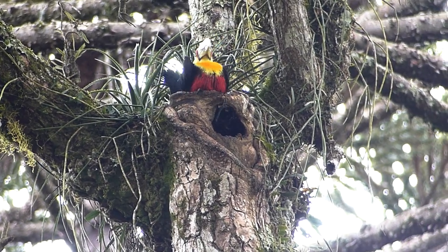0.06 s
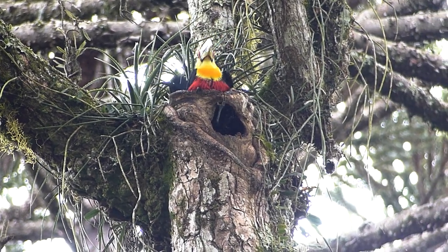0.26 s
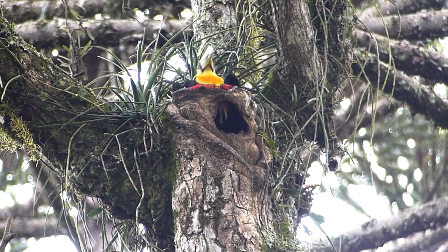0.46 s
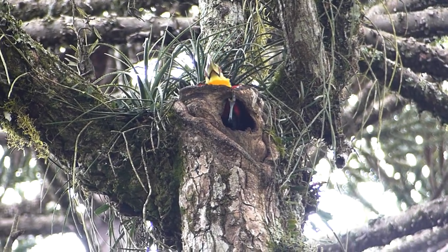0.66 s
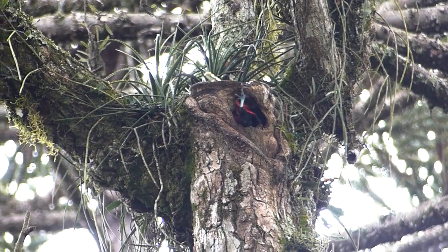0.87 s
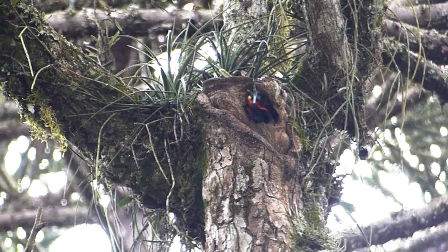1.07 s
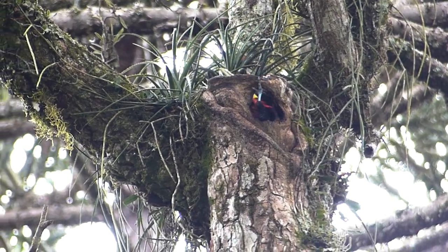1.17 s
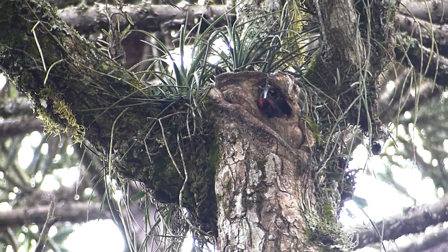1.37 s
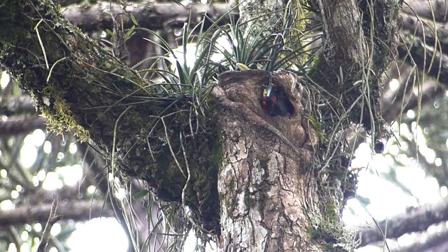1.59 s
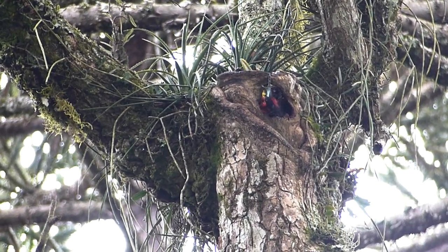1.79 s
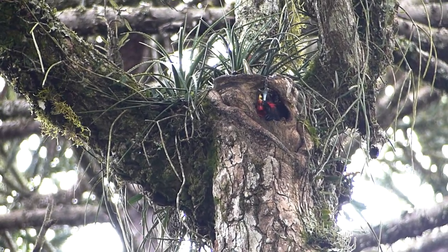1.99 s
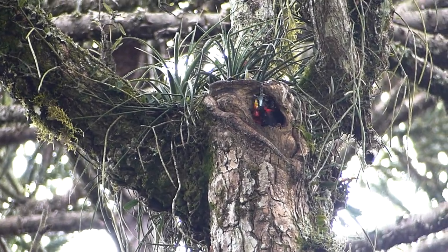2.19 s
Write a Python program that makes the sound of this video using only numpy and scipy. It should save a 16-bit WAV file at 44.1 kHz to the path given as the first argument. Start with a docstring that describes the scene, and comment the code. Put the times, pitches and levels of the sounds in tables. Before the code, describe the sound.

A toucan gives one short harsh squawky yelp, echoing through a forest with faint distant birds

```python
"""A toucan calls in the forest

A toucan in a tree hole gives one short harsh call: two gliding sines, their sum tones and filtered breath noise.
Decaying noise, convolved with the call, makes the forest's echo. Far off another bird, three partials on one
glide, whistles up, holds and slides down amid faint chirps and twitter. An earlier call dies away as filtered
noise; twigs tick as resonant bursts; insects, a wavering far tone and the air are shaped noise."""
import sys
import numpy as np
from scipy import signal
from scipy.io import wavfile

SR = 44100
rng = np.random.default_rng(int(sys.argv[2]) if len(sys.argv) > 2 else 0)


def boost_factor(decibels):
    """Convert a level in decibels to a linear amplitude factor."""
    exponent = np.asarray(decibels, float) / 20
    return 10 ** exponent


def bounce(signal):
    """Save signal as a 16-bit WAV file at the path given by the first command-line argument."""
    frames = np.transpose(np.atleast_2d(signal))
    limited = np.clip(frames, -1, 1)
    pcm = np.round(limited * 32767).astype(np.int16)
    wavfile.write(sys.argv[1], SR, pcm)


N = 99225   # length [samples]


def rms_one(x):
    """Normalization: divides by the root mean square."""
    return x / np.sqrt(np.mean(x ** 2) + 1e-20)


def at_hz(points, hz):
    """Spectral interpolation: linear over log frequency."""
    table_hz, value = np.array(points)[:, :2].T
    return np.interp(np.log(hz), np.log(table_hz), value)


def track(rows, edge_s=0.0043):
    """Piecewise-linear contours: columns joined in time; the last is dB and becomes a gain gated to the rows."""
    s, *columns = np.transpose(rows)
    t = np.arange(N) / SR
    gate = np.clip(np.minimum(t - s[0], s[-1] - t) / edge_s + .5, 0, 1)
    lines = [np.interp(t, s, c) for c in columns]
    return lines[:-1] + [boost_factor(lines[-1]) * gate]


def drift(rate):
    """Random modulation: white noise through a two-pole lowpass with its corner near rate [Hz]; rms 1."""
    r = np.exp(-2 * np.pi * rate / SR)
    slow = signal.lfilter([1], [1, -2 * r, r * r], rng.standard_normal(N + SR))
    return rms_one(slow[SR:])   # the filter has settled


def resonate(x, hz, width):
    """Damped resonance: a pole pair whose radius sets the bandwidth, with zeros at 0 Hz and SR / 2."""
    r = np.exp(-np.pi * width / SR)
    zeros = [(1 - r * r) / 2, 0, (r * r - 1) / 2]
    poles = [1, -2 * r * np.cos(2 * np.pi * hz / SR), r * r]
    return signal.lfilter(zeros, poles, x + 1e-18)


def bandpass(x, order, low_hz, high_hz):
    """Band limiting by a Butterworth filter."""
    return signal.sosfilt(signal.butter(order, [low_hz, high_hz], "band", fs=SR, output="sos"), x)


def left_right(mid, side):
    """Mid/side stereo: left is the sum, right the difference."""
    return mid + side * [[1], [-1]]


def pan(x, db):
    """Interaural level difference: left is db above right."""
    return x * boost_factor(np.array([[db / 2], [-db / 2]]))


def narrow_noise(hz, width, side_db):
    """Resonance-filtered noise: stereo noise twice through one resonance; mid rms about 1."""
    once = resonate(rng.standard_normal((2, N)), hz, width)
    mid, side = rms_one(resonate(once, hz, width))
    return left_right(mid, boost_factor(side_db) * side)


# spectrum of the air: (frequency [Hz], relative density [dB per Hz])
AIR_SPECTRUM = [(15, -22), (25, -8), (45, -13), (90, -11), (135, -3.5), (180, -8), (400, -7.5), (700, -7.5),
                (1000, -4.5), (1250, -7), (1700, -13.5), (2400, -17.5), (3500, -21), (4900, -16.5),
                (6000, -19.5), (9000, -19.5), (12000, -24.5), (15000, -32)]
# stereo width of the air: (frequency [Hz], side minus mid [dB])
AIR_WIDTH = [(30, -23), (110, -4.5), (200, 2), (370, 9), (690, 6.5), (1260, -1.5), (2320, 1), (4260, -3),
             (7840, -7), (14400, -6.5)]
# rise and fall of the air around 950 Hz: (time [s], relative level [dB])
AIR_RUSTLE = [(0.0, -63.5), (0.44, -61.5), (0.85, -64.5), (1.2, -62), (1.52, -65.5), (2.01, -66),
              (2.25, -66)]


def air(patchy_db):
    """Third-octave noise synthesis: each band has its own level, flicker and stereo width; mid rms 1."""
    mids, sides = 0, 0
    edges = 20 * 2 ** (np.arange(30) / 3)
    white = rng.standard_normal((2, 2, N + SR // 4))   # neighbouring bands use different noise
    rustle = track(AIR_RUSTLE, edge_s=1e-6)[0]
    rustle = rustle / rustle.mean()
    for k, (low, high) in enumerate(zip(edges, edges[1:])):
        mid, side = bandpass(white[k % 2], 2, low, high)[:, -N:]
        hz = np.sqrt(low * high)
        rustle_share = np.exp(-np.log2(hz / 950) ** 2 / 0.2)
        gain = boost_factor(at_hz(AIR_SPECTRUM, hz) + patchy_db * drift(15.3)) * rustle ** rustle_share
        mids = mids + gain * mid
        sides = sides + gain * boost_factor(at_hz(AIR_WIDTH, hz)) * side
    return left_right(mids, sides) / np.std(mids)


# insect bands: (centre [Hz], width of each resonance [Hz], median mid level [dB])
INSECT_BANDS = [(5996, 650, -75), (6540, 100, -83)]


def insects():
    """Amplitude-modulated band noise: steady hiss bands that waver slightly."""
    return sum(boost_factor(db + 0.5 * drift(3.4)) * narrow_noise(hz, width, side_db=-6)
               for hz, width, db in INSECT_BANDS)


# envelope of a wavering far tone, 5 dB above what is played: (time [s], level [dB])
HUM_LEVEL = [(0.0, -70.5), (1.12, -65), (1.14, -57.5), (1.65, -76), (1.83, -60.5), (1.89, -73), (2.24, -71),
             (2.25, -77)]


def hum():
    """Narrow-band noise: so small a bandwidth is heard as a wavering tone."""
    return boost_factor(-5) * track(HUM_LEVEL, edge_s=1e-6)[0] * narrow_noise(821, 36.6, side_db=-16)


# drips and twig ticks: (time [s], relative level [dB], resonance [Hz], width [Hz])
TICK_EVENTS = [(.93, -49.5, 9200, 5000), (0.9541, -48, 7870, 5000), (0.98, -48, 8430, 5000),
               (1.1928, -45, 1230, 685), (1.194, -49, 4600, 3980), (1.615, -48, 9500, 6040),
               (1.661, -52, 9000, 6000), (2.109, -53, 8000, 6000)]


def ticks():
    """Impulsive excitation of a resonance: noise bursts dying by 1/e in 2.5 cycles."""
    t, white = np.arange(N) / SR, rng.standard_normal(N)
    out = 0
    for s, db, hz, width in TICK_EVENTS:
        burst = white * (t >= s) * np.exp(-np.maximum(t - s, 0) * hz / 2.5)
        out = out + boost_factor(db) * np.sqrt(SR / width) * resonate(burst, hz, width) / 2
    return out


# breathy far birds: (start [s], length [s], centre [Hz], resonance width [Hz], median level at full swell [dB])
TWITTER_NOTES = [(0.76, 0.41, 4050, 490, -74), (0.418, 0.12, 4100, 290, -68), (2.07, 0.11, 1160, 990, -66),
                 (0.39, 0.83, 2840, 360, -74.5), (1.9, 0.098, 3350, 700, -59),
                 (1.677, 0.34, 2760, 640, -74), (1.85, 0.43, 3900, 370, -67), (1.05, 1, 1920, 61, -80.5)]


def twitter():
    """Modulated narrow-band noise: flickering bands swell and fade along half a sine."""
    t, out = np.arange(N) / SR, 0
    for s, length, hz, width, db in TWITTER_NOTES:
        swell = np.sin(np.pi * np.clip((t - s) / length, 0, 1))
        out = out + boost_factor(db + 2.35 * drift(13.4)) * swell * narrow_noise(hz, width, side_db=-5.5)
    return out


def earlier_echo():
    """Exponential reverberant decay: band noise stands for the dying echo of a call made just before."""
    start_db, t60_s = -61.5, 0.94
    mid, side = rms_one(bandpass(rng.standard_normal((2, N)), 4, 1940, 3100))
    return boost_factor(start_db - 60 * np.arange(N) / SR / t60_s) * left_right(mid, .6 * side)


# echo of the forest: (frequency [Hz], T60 before the factor "longer" [s], relative level [dB])
FOREST_DECAY = [(1200, 0.67, 4), (1770, 0.97, -8), (2480, 0.59, 1), (3440, 0.72, 0.5), (5000, 0.74, 3),
                (9900, 0.47, -0.5)]


def forest(x, longer):
    """Diffuse scattering from trunks and leaves: noise dies band by band over a faint long tail of far trees."""
    echo_rise_s, alike = 0.0027, 0.68   # alike: share of noise power common to both sides
    far_t60_s, far_db, far_cut_hz = 2.4, -15.5, 4200
    t = np.arange(2 * SR) / SR
    white = rng.standard_normal((3, 2 * SR))
    white = np.sqrt(alike) * white[0] + np.sqrt(1 - alike) * white[1:]
    edges = 700 * 2. ** np.arange(0, 4.6, .5)   # half octaves
    levels, tail = np.array(FOREST_DECAY)[:, ::2], 0
    for a, b in zip(edges, edges[1:]):
        hz = np.sqrt(a * b)
        t60 = longer * at_hz(FOREST_DECAY, hz)
        near = boost_factor(-60 * t / t60) / np.sqrt(t60)
        far = (hz < far_cut_hz) * boost_factor(far_db - 60 * t / far_t60_s)
        tail = tail + boost_factor(at_hz(levels, hz)) * (near + far) * bandpass(white, 2, a, b)
    tail = tail * np.clip(t / echo_rise_s, 0, 1) * np.sqrt(2 * np.log(1000) / SR)
    return signal.fftconvolve(x[None], tail, axes=1)[:, :N]


# far whistle, second partial: (time [s], pitch [Hz], rms level before the mix gains [dB])
WHISTLE_TRACK = [(1.762, 3153, -76), (1.772, 3247, -56.5), (1.782, 3380, -56), (1.81, 3760, -60.5),
                 (1.845, 3790, -53), (1.862, 3790, -55.5), (1.874, 3790, -66), (1.89, 3780, -57),
                 (1.92, 3550, -54), (1.958, 3250, -56), (2.0, 2900, -66), (2.045, 2650, -67.5),
                 (2.1, 2520, -77), (2.25, 2430, -72.5)]
# fainter chirps: (start [s], length [s], from [Hz], to [Hz], rms level at full swell before the mix gains [dB])
CHIRP_GLIDES = [(.655, .075, 4020, 4380, -82), (0.667, 0.074, 2830, 2960, -76),
                (2.138, 0.17, 3710, 3690, -70)]


def far_birds():
    """Harmonic synthesis: a whistle whose second partial leads, and a few faint frequency glides."""
    low_db, third_db, low_full_from_s = -12.5, -22, 1.81
    (hz, size), t = track(WHISTLE_TRACK), np.arange(N) / SR
    p = 2 * np.pi * np.cumsum(hz) / SR
    low_rise = np.clip((t - low_full_from_s) / 0.015, .2, 1)   # a fifth at first, then up to full
    low = boost_factor(low_db) * low_rise * np.sin(p / 2)
    third = boost_factor(third_db) * np.sin(3 * p / 2)
    out = size * (np.sin(p) + low + third)
    for s, length, start_hz, end_hz, db in CHIRP_GLIDES:
        u = np.clip((t - s) / length, 0, 1)
        glide_hz = start_hz + (end_hz - start_hz) * u
        out += boost_factor(db) * np.sin(np.pi * u) * np.sin(2 * np.pi * np.cumsum(glide_hz) / SR)
    return np.sqrt(2) * out


def jittered_phase(hz):
    """Frequency modulation: phase is the running sum of pitch with 15.9 Hz rms of random jitter."""
    return 2 * np.pi * np.cumsum(hz + 15.9 * drift(177)) / SR


# Levels of the three voice tracks and the breath are rms, before the stereo gains.
# low voice of the call: (time [s], pitch [Hz], level [dB])
LOW_VOICE = [(.198, 2050, -76), (.208, 1942, -46.5), (.22, 1881, -41), (.236, 1944, -39.5),
             (.245, 2051, -45), (.258, 2216, -43), (.267, 2008, -43), (.277, 1754, -41), (.29, 1765, -36),
             (.300, 1737, -40.5), (.3055, 1568, -39.5), (.311, 1792, -33), (.322, 1743, -36.5),
             (.328, 1752, -47), (.334, 1630, -47.5), (.34, 1600, -45)]
# high voice, falling, then jumping up again: (time [s], pitch [Hz], level [dB])
HIGH_VOICE = [(.185, 4230, -77), (.195, 4070, -60), (.198, 3797, -68), (.203, 3383, -55.5),
              (.221, 3313, -51), (.23, 3031, -55), (.24, 2822, -50.5), (.25, 2776, -45.5),
              (.259, 2856, -65), (.263, 3442, -68), (.275, 3250, -59.5), (.295, 3288, -58.5),
              (.308, 3100, -63), (.313, 2940, -63)]
# high voice, closing slide: (time [s], pitch [Hz], level [dB])
CLOSING_SLIDE = [(0.314, 3194, -65), (0.326, 2838, -45.5), (0.346, 2042, -44), (0.352, 1965, -39.5),
                 (0.354, 1990, -43), (0.36, 1864, -40.5), (0.37, 1930, -59)]
# the two voices bend each other: (multiple of low, multiple of high, relative level [dB])
VOICE_SUM_TONES = [(1, 1, -13.5), (2, 1, -22), (1, 2, -24), (0, 2, -14), (0, 3, -13), (2, 0, -24.5),
                   (3, 0, -24.5)]
# overtones of the slide: (multiple, relative level [dB])
SLIDE_PARTIALS = [(3, -19), (4, -33)]
# breath rasp: (time [s], level [dB])
BREATH_LEVEL = [(0.19, -67), (0.214, -51.5), (0.238, -49.5), (0.314, -57.5), (0.344, -46), (0.38, -77)]
# throat resonances: (centre [Hz], width [Hz], relative level [dB])
THROAT_RESONANCES = [(3170, 1140, -0.5), (5000, 250, -8.5), (6440, 1700, 0.5), (8650, 840, 4),
                     (9900, 2800, -12), (12200, 1800, -16)]


def breath_rasp():
    """Source and filter: throbbing breath noise passes twice through each throat resonance."""
    breath = rng.standard_normal(N) * boost_factor(3 * drift(160))
    rasp = 0
    for k, (hz, width, db) in enumerate(THROAT_RESONANCES):
        band = rms_one(resonate(resonate(breath, hz, width), hz, width))
        rasp = rasp + (-1) ** k * boost_factor(db) * band   # alternating signs
    return track(BREATH_LEVEL)[0] * rms_one(rasp)


def toucan():
    """Nonlinear coupling of two sources: near-sine voices with rough sum tones and overtones, plus breath."""
    low_hz, low = track(LOW_VOICE)
    high_hz, high = track(HIGH_VOICE)
    slide_hz, slide = track(CLOSING_SLIDE)
    a, b, c = jittered_phase(low_hz), jittered_phase(high_hz), jittered_phase(slide_hz)

    def rough():
        """Random amplitude modulation of an overtone."""
        return 1 + 0.42 * drift(390)

    voices = low * np.sin(a) + high * np.sin(b) + slide * np.sin(c)
    out = voices * (1 + .08 * drift(150))
    for m, n, db in VOICE_SUM_TONES:
        if m and n:
            size = np.sqrt(low * high)
        else:
            size = low if m else high
        out += boost_factor(db) * size * rough() * np.sin(m * a + n * b)
    for k, db in SLIDE_PARTIALS:
        out += boost_factor(db) * slide * rough() * np.sin(k * c)
    return np.sqrt(2) * out + breath_rasp()


def scene():
    """Superposition: background noise, far birds and the call add linearly, direct sound with echo."""
    call, far = toucan(), far_birds()
    out = boost_factor(-62) * air(patchy_db=1.73) + insects() + hum()
    out += ticks() + twitter() + earlier_echo()
    out += pan(boost_factor(-0.5) * far + boost_factor(8.5) * forest(far, longer=1.29), -3)
    out += pan(call, 4.5) + pan(boost_factor(3) * forest(call, longer=0.82), 0.99)
    return out


def top_cut(x):
    """Nothing passes above the cut-off."""
    return signal.sosfilt(signal.butter(12, 15010, fs=SR, output="sos"), x)


def record(dry):
    """Band limiting: a steep lowpass, 60 dB down from 16.2 kHz, removes the top."""
    mix = signal.sosfilt(signal.cheby2(12, 60, 16223.9, fs=SR, output="sos"), dry)
    return top_cut(mix)


dry = scene()
out = record(dry)
bounce(out)
```